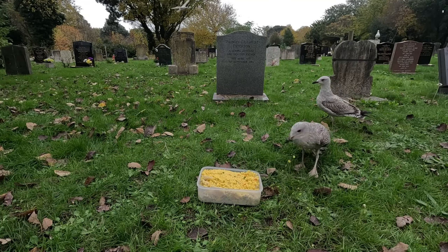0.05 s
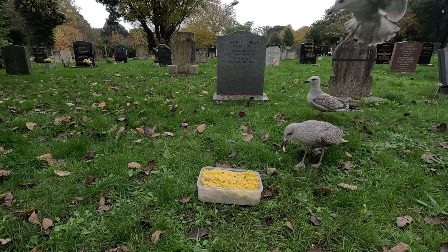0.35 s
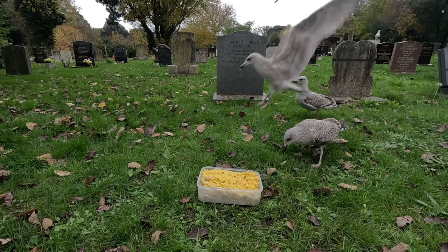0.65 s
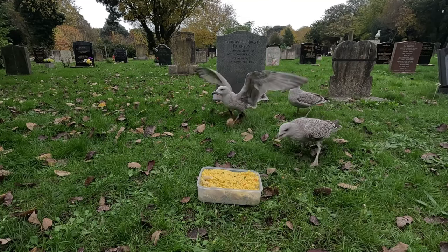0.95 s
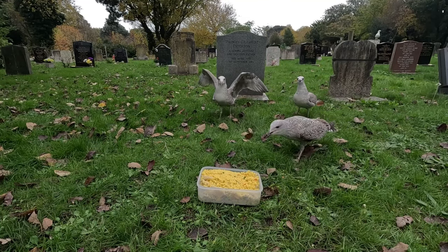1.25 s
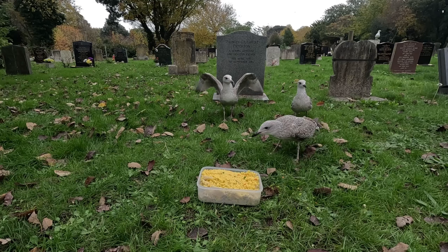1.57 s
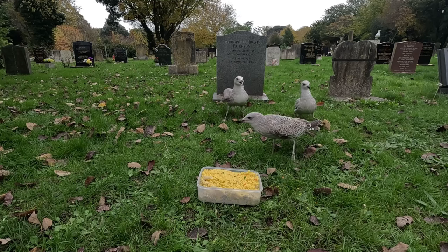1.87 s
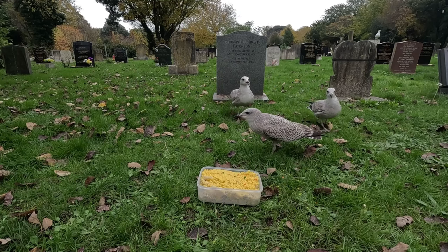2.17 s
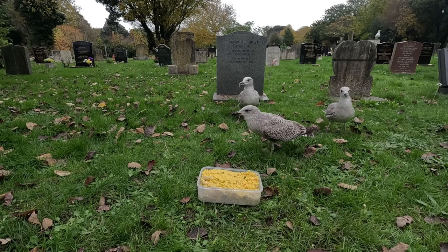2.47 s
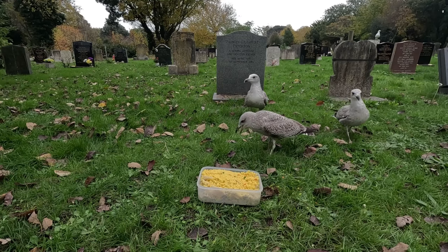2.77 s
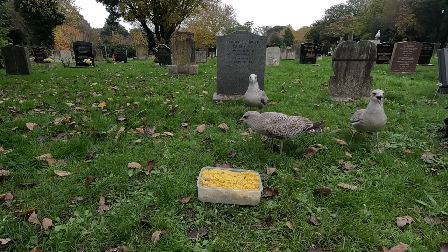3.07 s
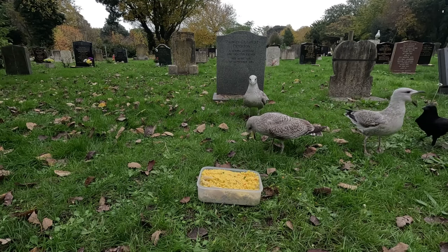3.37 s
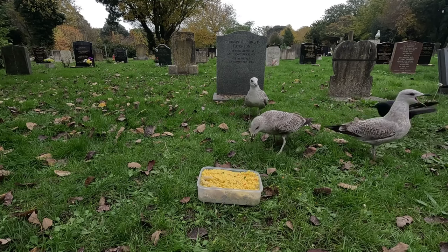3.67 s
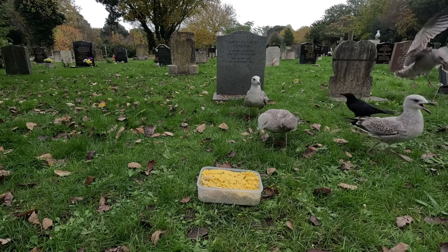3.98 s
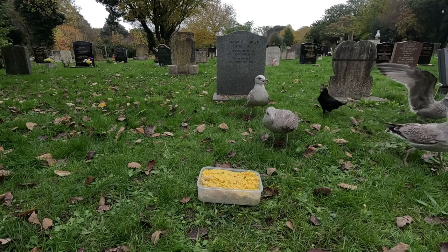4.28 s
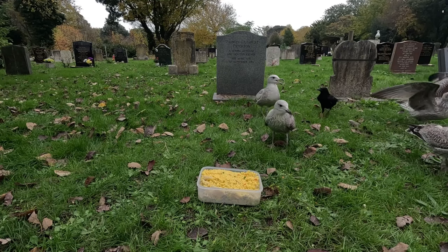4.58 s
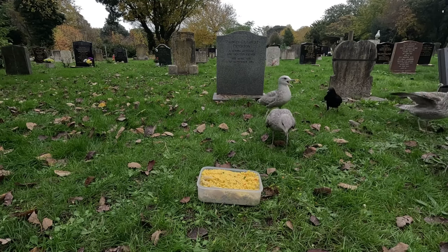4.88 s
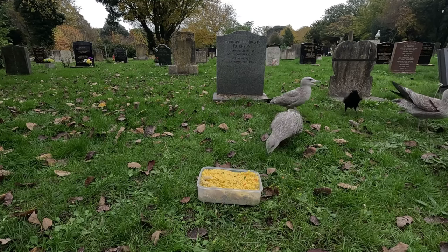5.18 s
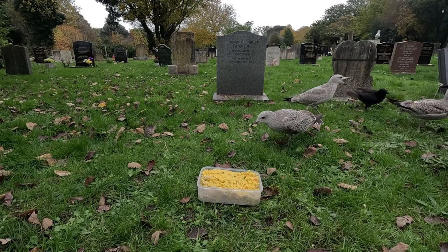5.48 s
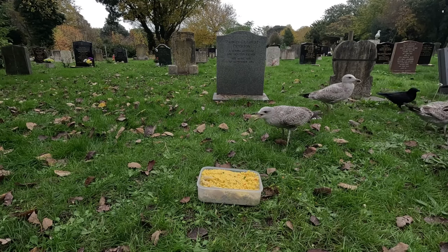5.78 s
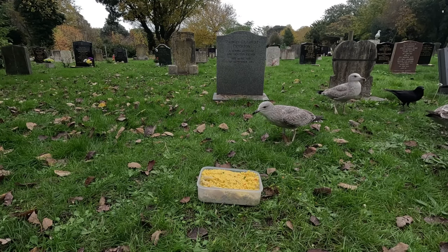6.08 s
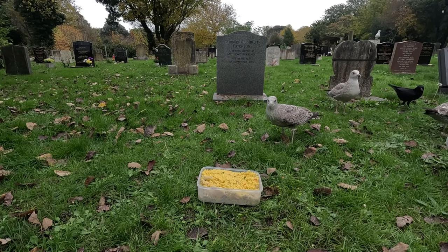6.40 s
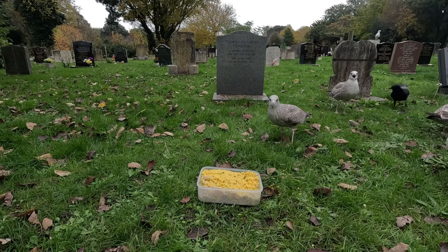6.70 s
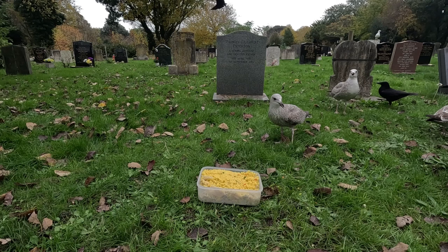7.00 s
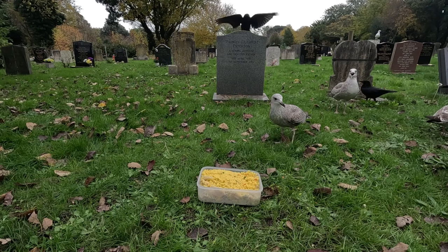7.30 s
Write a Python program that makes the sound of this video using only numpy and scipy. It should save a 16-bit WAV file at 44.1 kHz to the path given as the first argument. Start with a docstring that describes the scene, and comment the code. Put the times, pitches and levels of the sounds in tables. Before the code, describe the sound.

Close up on open grass, young gulls land with soft wing thumps, feather rustle and low gusts on the microphone. They whistle thinly, squeal and squawk in repeated bursts, the whistling thickest in the middle. In the second half a more distant gull yelps again and again, and wings swish once more before a last quavering squeal. A faint outdoor rumble lies beneath.

```python
"""Young gulls squabble over food on an open lawn, close to the microphone. Membranes in the syrinx make
their thin begging whistles, their two-voiced squeals (both sides sounding at once) and their harsh
squawks (uneven pulses ringing in throat and beak). Wings thump and swish as birds land, feathers rustle,
and air buffets the microphone over a faint distant rumble. Further off the flock peeps, a small bird
twitters and one gull gives a run of falling yelps; stones and trees return a dull tail."""
import sys
import numpy as np
from scipy import signal
from scipy.fft import rfft, irfft
from scipy.io import wavfile
from scipy.ndimage import uniform_filter1d

SR = 44100
rng = np.random.default_rng(int(sys.argv[2]) if len(sys.argv) > 2 else 0)


def output_pcm(signal):
    """Save a mono or channel-first signal as 16-bit PCM at the path in sys.argv[1].

    Samples are clipped to [-1, 1] before scaling.
    """
    pcm = np.clip(np.atleast_2d(signal).T, -1, 1) * 32767
    wavfile.write(sys.argv[1], SR, np.round(pcm).astype(np.int16))


N = 328545
TIME = np.arange(N) / SR
CUTOFF_HZ = 15700


def from_db(db):
    return 10 ** (np.asarray(db) / 20)


def rms_one(x):
    return x / np.sqrt(np.mean(x ** 2) + 1e-20)


def gain_at(colour, hz):
    """A colour's gain at these frequencies."""
    known_hz, level_db = np.transpose(colour)
    return from_db(np.interp(np.log(np.maximum(hz, 1)), np.log(known_hz), level_db))


def coloured(x, colour, size=4096):
    """Causal (minimum-phase) filter with the given colour."""
    cepstrum = irfft(np.log(gain_at(colour, np.arange(size // 2 + 1) * SR / size)))
    cepstrum[1:size // 2] *= 2
    cepstrum[size // 2 + 1:] = 0
    return signal.fftconvolve(x, irfft(np.exp(rfft(cepstrum))))[:len(x)]


def noise(colour):
    """Steady noise of a colour, rms 1."""
    return rms_one(coloured(rng.standard_normal(N + SR), colour)[SR:])


def wander(per_s, count):
    """A random value redrawn so many times a second and joined up; spread about 1."""
    return np.interp(np.arange(count) * per_s / SR, np.arange(count), rng.standard_normal(count))


def swells(rows):
    """Gain over time of smooth swells that rise and fall."""
    return sum(from_db(db) * np.exp(-((TIME - s) / half_s) ** 2) for s, half_s, db in rows)


def call(rows, fade_s):
    """The samples that a call covers, its soft-edged gate, and its columns sample by sample."""
    times, *columns = np.transpose(rows)
    start, end = times[0], times[-1]
    span = slice(max(int((start - fade_s / 2) * SR), 0), min(int((end + fade_s / 2) * SR), N))
    t = TIME[span]
    gate = np.sin(np.pi / 2 * np.clip(np.minimum(t - start, end - t) / fade_s + .5, 0, 1)) ** 2
    return span, gate, [np.interp(t, times, column) for column in columns]


def note(start, length_s, fade_s):
    """A note's samples, gate, progress from 0 to 1, and nearness to either end (0 in the middle)."""
    span, gate, (progress,) = call([(start, 0), (start + length_s, 1)], fade_s)
    return span, gate, progress, (2 * progress - 1) ** 2


def phase_of(hz, jitter, per_s):
    """Phase of a membrane whose pitch trembles by the share jitter."""
    return 2 * np.pi * np.cumsum(hz * (1 + jitter * wander(per_s, len(hz)))) / SR


def overtones(phase, hz, colour, highest, flicker_db=3.5):
    """Harmonics from the second up, each flickering and weighted by the colour at its frequency."""
    return sum(gain_at(colour, k * hz) * from_db(flicker_db * wander(79, len(hz)))
               * (k * hz < CUTOFF_HZ) * np.sin(k * phase) for k in range(2, highest + 1))


def two_voices(low_hz, low_db, high_hz, high_db, hoarse, rasp_hz=280, flutter_db=2.5):
    """Two membranes shake each other, adding sum and difference tones; hoarseness makes them rasp."""
    count, jitter = len(low_hz), .02 * hoarse
    tension = 1 + .008 * wander(70, count)
    low = phase_of(low_hz * tension, jitter, per_s=700)
    high = phase_of(high_hz * tension, jitter, per_s=900)
    rasp_depth = hoarse * np.clip(.6 + .4 * wander(40, count), 0, 1)
    rasp = rasp_depth * np.sin(phase_of(np.full(count, rasp_hz), jitter=.3, per_s=120))
    low_gain, high_gain = (from_db(db + flutter_db * wander(130, count)) for db in (low_db, high_db))
    voices = low_gain * np.sin(low) + high_gain * (1 + rasp) * np.sin(high + rasp)
    side_tones = from_db(-14) * np.sin(2 * high - low) + from_db(-16) * np.sin(2 * low - high)
    sum_gain = from_db(-33 + 3 * wander(90, count))
    octave = (.8 + .7 * wander(1500, count)) * (np.sin(low + high) + .7 * np.sin(2 * high))
    sum_tones = sum_gain * (octave + .5 * wander(1500, count) * np.sin(2 * low + high))
    breath = from_db(-12) * wander(1900, count) + from_db(-24) * wander(6300, count)
    hiss = hoarse * breath * np.sin((low + high) / 2)   # centred between the voices
    return np.sqrt(2) * (voices + from_db((low_db + high_db) / 2) * (side_tones + sum_tones + hiss))


# Squeals near the microphone, one list a call. Each row: time in seconds, low voice in Hz, its level
# in dB, high voice in Hz, its level in dB, hoarseness from 0 to 1.
SQUEALS = [
    [(0.0, 3960, -34, 4700, -29.5, 0.9), (.025, 4030, -33, 4700, -36, 0.6),
     (0.047, 3750, -38, 4750, -33, .8), (.073, 4150, -28, 4650, -31, 0.86),
     (0.096, 3920, -19, 4430, -42, .3), (0.125, 3250, -45, 3900, -28, .6)],
    [(1.885, 3280, -25.5, 4080, -26, 0.75), (1.925, 3540, -34, 4010, -17.5, 0.65),
     (1.966, 3760, -27, 4640, -28, 0.54), (2.027, 4490, -33, 5490, -29.5, 0.4),
     (2.1, 4250, -31, 5040, -31, 0.4), (2.185, 4150, -33.5, 5050, -29.5, 0.5)],
    [(2.99, 3730, -43, 4710, -26.5, 0.4), (3.05, 3620, -40.5, 5220, -47.5, .3),
     (3.085, 3740, -33, 5820, -49.5, 0.4)],
    [(4.225, 3300, -34.5, 4050, -28.5, .8), (4.274, 3466, -35.5, 4120, -23, .8),
     (4.318, 3960, -32, 4900, -35, .6), (4.36, 4270, -39.5, 5050, -28, 0.3),
     (4.42, 4050, -30, 4760, -42, 0.3), (4.465, 3780, -34, 4570, -36, 0.7),
     (4.485, 3980, -29.5, 4650, -37, .7), (4.52, 3640, -35, 4290, -31.5, 1),
     (4.59, 3800, -31, 4480, -31, 1)],
    [(6.793, 3150, -31, 3800, -33, .8), (6.81, 3480, -28, 4180, -26, .5), (6.858, 3500, -27, 4300, -25, .4),
     (6.89, 4100, -31, 4950, -27, .4), (6.915, 4470, -39, 5360, -24, 0.3),
     (6.97, 4290, -32, 5060, -28, 0.54), (7.05, 4170, -31, 4880, -30.5, 0.54),
     (7.138, 3900, -32.5, 4840, -31, 0.9)],
]
# The notes a squeal breaks into. Each row: start and length in seconds, low voice in Hz, its level
# in dB, high voice in Hz, its level in dB.
QUAVERS = [(4.59, .04, 3300, -35, 4100, -34), (4.63, .036, 3550, -34, 4300, -36),
           (4.666, .036, 3500, -36, 3950, -29), (4.702, .046, 3350, -30, 3750, -29),
           (4.748, .042, 2680, -26, 3250, -22), (4.79, .046, 2850, -25, 3080, -28),
           (7.138, .042, 4060, -32, 4950, -34), (7.18, .036, 3950, -34, 4780, -35),
           (7.216, .034, 3870, -34, 4550, -34), (7.25, .036, 3800, -35, 4300, -33),
           (7.286, .036, 3720, -33, 4500, -33), (7.322, .042, 3400, -27, 4080, -31),
           (7.364, .042, 3400, -28, 3950, -33), (7.406, .043, 3320, -19, 3950, -41)]


def squeals(quaver_arch=.11):
    """Both sides of the syrinx sound at once, rising and sagging; the longest calls end in a quaver."""
    out = np.zeros(N)
    for rows in SQUEALS:
        span, gate, controls = call(rows, fade_s=0.019)
        out[span] += gate * two_voices(*controls)
    for start, length_s, low_hz, low_db, high_hz, high_db in QUAVERS:
        span, gate, _, edge = note(start, length_s, fade_s=0.006)
        arch = 1 - quaver_arch * edge
        out[span] += gate * two_voices(low_hz * arch, low_db, high_hz * np.sqrt(arch), high_db, hoarse=.5)
    return out


# Breath and feather hiss at close range. Each row: frequency in Hz, gain in dB.
HISS_COLOUR = [(500, -13), (2500, -3), (5000, -11), (7000, -1), (9000, -17), (12500, -20), (15500, -34)]


def throat_hiss(voices, hiss_db=-39.0, flicker_db=4.5):
    """Air rushing through an open beak hisses and flickers, following the level of the call."""
    effort = np.sqrt(np.maximum(uniform_filter1d(voices ** 2, size=400), 0))
    return from_db(hiss_db + flicker_db * wander(120, N)) * effort * noise(HISS_COLOUR)


def rumble(colour, top_hz=600):
    """Noise of moving air, with no treble and an even level."""
    flow = signal.sosfilt(signal.butter(2, top_hz, fs=SR, output="sos"), noise(colour))
    return flow / np.sqrt(uniform_filter1d(uniform_filter1d(flow ** 2, size=1100), size=1100))


# Gusts and wing wash on the microphone, and the far background. Each row: frequency in Hz, gain in dB.
GUST_COLOUR = [(12, -16), (25, 2), (45, 1), (80, -8), (150, -24), (400, -34), (1000, -40)]
BUFFET_COLOUR = [(20, -20), (45, -4), (60, 2), (100, -9), (140, -18), (220, -28), (400, -35), (1000, -50)]
FAR_COLOUR = [(25, 3), (60, -8), (120, -15), (300, -17), (650, -25), (1100, -15), (1800, -24), (4500, -26),
              (6500, -30), (8500, -43), (14000, -52)]
# Puffs of air as birds pass the microphone. Each row: middle and half-length in seconds, deep rumble
# in dB, buffeting in dB.
GUSTS = [(.15, 0.45, -36.5, -45.5), (0.888, 0.11, -27.5, -32), (1.143, 0.09, -29, -37),
         (1.555, 0.21, -32, -39.5), (1.837, 0.055, -27.5, -27), (2.001, 0.094, -30, -27.5),
         (2.17, 0.13, -36, -42.5), (3.714, 0.061, -34, -33.5), (3.885, 0.02, -40, -25.5),
         (4.37, 0.069, -37.5, -55), (5.601, 0.086, -35.5, -31), (5.96, 0.057, -37, -39.5),
         (6.373, 0.13, -36, -55), (6.73, 0.081, -31, -43), (7.25, 0.52, -45, -60)]


def air(breeze_db=-51, lumpy_db=1.5, far_db=-47.5):
    """Gusts rumble on the microphone and close wing wash buffets it; a distant background lies below."""
    gust_gain = from_db(breeze_db) + swells([(s, half_s, db) for s, half_s, db, _ in GUSTS])
    gust = gust_gain * rumble(GUST_COLOUR)
    buffet = swells([(s, half_s, db) for s, half_s, _, db in GUSTS]) * rumble(BUFFET_COLOUR)
    return from_db(lumpy_db * wander(13, N)) * (gust + buffet) + from_db(far_db) * noise(FAR_COLOUR)


def beak_band(x, centre_hz, size=32):
    """The part of a voice within about 600 Hz of the beak's moving resonance."""
    turn = np.exp(2j * np.pi * np.cumsum(centre_hz) / SR)
    window = np.hanning(2 * size + 1)
    return 2 * np.real(turn * signal.fftconvolve(x / turn, window / window.sum(), "same"))


# The throat of a gull close by. Each row: frequency in Hz, gain in dB.
THROAT_COLOUR = [(300, -40), (520, -24), (780, -30), (1200, -4), (1900, -4), (2700, 0), (4100, -7),
                 (5200, -24), (7000, -36), (8500, -46), (14000, -53)]


def harsh_voice(hz, db, doubling, rough, beak_hz, beak_db, patchy_db=4, flutter_db=1.8):
    """Pulses ring in throat and beak; doubling weakens every other one, roughness makes them chaotic."""
    count, rough = len(hz), np.clip(rough, 0, 1)
    unrest = np.sqrt(rough)
    doubling = np.clip(doubling + .45 * unrest * wander(70, count), 0, 1)   # the voice breaks in fits
    hz = uniform_filter1d(hz * (1 + .022 * unrest * wander(90, count)), size=300)
    phase = phase_of(hz, jitter=.05 * rough, per_s=1100)
    cycle = np.round(phase / (2 * np.pi)).astype(int)
    strength = (1 - doubling * (cycle % 2)) * (1 + .7 * rough * rng.uniform(-1, 1, count)[cycle])
    pulses = np.zeros(count)
    for k in range(1, 11):
        smeared_phase = phase - (k - 2) / 2 + .1 * rough * wander(500, count)
        gain = from_db(patchy_db * unrest * wander(110, count)) / (1 + (k * hz / 9500) ** 8)
        pulses += gain * np.cos(k * smeared_phase)
    turbulence = .42 * rough * rng.standard_normal(count)
    voice = coloured(strength * pulses + turbulence, THROAT_COLOUR)
    voice = voice + (from_db(beak_db) - 1) * beak_band(voice, beak_hz)
    voice = signal.sosfilt(signal.butter(4, 450, "high", fs=SR, output="sos"), voice)
    levelled = voice / np.sqrt(uniform_filter1d(voice ** 2, size=260) + 1e-9)
    return from_db(db + flutter_db * unrest * wander(220, count)) * levelled


# Screams close to the microphone, one list a call. Each row: time in seconds, pitch in Hz, relative level
# in dB, period doubling and roughness (both full at 1), beak resonance in Hz, its lift in dB.
SCREAMS = [
    [(0.065, 1336, -40, .95, .9, 2200, 0), (0.106, 1320, -24, .9, .4, 2200, 2),
     (0.159, 1165, -27.5, .8, .4, 2600, -9), (0.222, 1130, -27, .85, .25, 3650, 13),
     (0.24, 1113, -30, 0.8, 0.48, 3600, -9), (0.341, 1048, -38.5, 0.9, 1, 1700, 10),
     (0.41, 1010, -36.5, 0.75, 0.84, 1650, 25), (0.45, 970, -52, .7, 1, 1500, 10)],
    [(2.188, 1327, -14.5, .1, .05, 2650, 4), (2.215, 1487, -16, .35, .03, 4300, 5),
     (2.24, 1515, -16.5, .5, 0, 3700, 5), (2.268, 1442, -19, .05, .01, 4200, 5),
     (2.288, 1393, -17.5, .7, 0, 4200, 4), (2.31, 1358, -21.5, 0.5, 0.08, 4100, 9.5),
     (2.335, 1319, -17.5, .1, 0, 4000, 3), (2.35, 1467, -22.5, 0, 0.34, 3000, -1),
     (2.368, 1610, -19.5, 0.76, .3, 2900, 3.5), (2.392, 1450, -18.5, 0.2, 0.4, 2900, 3),
     (2.424, 1660, -21, 0.33, .4, 3300, 2.5), (2.44, 1466, -20.5, 0, .4, 2900, -5),
     (2.468, 1250, -24.5, 1, 0.3, 2500, -10), (2.485, 1200, -58, 1, .8, 2400, 6),
     (2.52, 1077, -32.5, 0, 0.3, 1100, 22)],
    [(4.843, 1365, -19, .3, .2, 2730, 3), (4.866, 1385, -16.5, .05, .06, 2750, 5),
     (4.885, 1275, -18, .15, .1, 2550, 5), (4.912, 1285, -19, .75, .15, 2900, 3),
     (4.938, 1236, -21, 0.5, 0.3, 2460, 7), (4.96, 1255, -20, 0.83, 0.42, 2530, 8),
     (4.985, 1202, -20.5, 0.3, 0.42, 2400, 8), (5.012, 1197, -18.5, 0.6, 0.2, 2400, 9.5),
     (5.026, 1146, -26.5, 0.94, .7, 2700, -5), (5.05, 1200, -21, 0.85, 0.7, 2650, 1.5),
     (5.07, 1117, -26, .9, 1.1, 1300, 14), (5.098, 1173, -22.5, 0.9, .65, 1800, 9),
     (5.117, 1119, -27, 1, 0.66, 2200, 1), (5.143, 1146, -23, 1, 1, 2800, -1),
     (5.19, 1098, -29, 1, 0.7, 1600, 9), (5.205, 1000, -51, .95, .7, 1600, 0)],
]
# Barks, just as close. Each row: start and length in seconds, pitch and glide in Hz, relative level
# in dB, period doubling and roughness (both full at 1), the beak's lift of the second harmonic in dB.
BARKS = [(1.205, 0.026, 1263, 101, -26.5, 0.6, 0.97, -0.5), (1.395, 0.028, 1134, 206, -35.5, 0.2, 0.5, 6.5),
         (1.501, 0.022, 1170, 217, -32, 1, 0.65, 14.5), (1.676, 0.05, 1276, -62, -35.5, 1, 1, 3.5),
         (1.846, 0.022, 1207, 200, -26.5, 0.15, 0.88, -15.5),
         (2.969, 0.036, 1515, 159, -32.5, 0.2, 1.2, -6), (3.694, 0.03, 1187, 226, -32.5, 0.4, 0.93, 2),
         (3.827, 0.042, 1172, 658, -31.5, 0.06, 0.63, -8.5), (5.219, 0.024, 1136, 39, -35.5, 1, 0.54, 5),
         (5.492, 0.022, 1380, 130, -29.5, 0.3, 0.35, 2.5),
         (5.694, 0.0286, 1262, 287, -28.5, 0.8, 0.83, -4.5), (5.815, 0.053, 1289, 2.5, -30, 0.7, 0.73, 5.5),
         (5.927, 0.13, 1483, -76.5, -31, 0.9, 1.1, -1), (6.765, 0.02, 1360, 77, -35, 0.24, 1.2, -9),
         (7.075, 0.018, 1597, -54, -36, 0, 0.7, 1)]


def squawks(scream_db=1.5, bark_db=8.0, bark_bend=.12, bark_arch_db=9):
    """The harsh voice, drawn out in screams or pushed out in short barks that arch in pitch and level."""
    out = np.zeros(N)
    for rows in SCREAMS:
        span, gate, controls = call(rows, fade_s=.005)
        out[span] += from_db(scream_db) * gate * harsh_voice(*controls)
    for start, length_s, pitch_hz, glide_hz, db, doubling, rough, beak_db in BARKS:
        span, gate, progress, edge = note(start, length_s, fade_s=0.0055)
        hz = (pitch_hz + glide_hz * progress) * (1 - bark_bend * (edge - edge.mean()))
        effort_db = bark_db + db - bark_arch_db * edge
        out[span] += gate * harsh_voice(hz, effort_db, doubling, rough, 2 * hz, beak_db)
    return out


# The thin voice of a young gull nearby. Each row: frequency in Hz, gain in dB.
WHISTLE_COLOUR = [(1800, -2), (3500, -1.5), (4500, -5), (6500, -6.5), (8500, -34), (12500, -46.5),
                  (15500, -85)]


def thin_voice(phase, hz, overtone_db, highest):
    """A membrane's tone, with overtones coloured relative to the fundamental."""
    upper = overtones(phase, hz, WHISTLE_COLOUR, highest) / gain_at(WHISTLE_COLOUR, hz)
    return np.sqrt(2) * (np.sin(phase) + from_db(overtone_db) * upper)


# Begging on the grass close by. Each row: start and length in seconds, pitch and glide in Hz, share by
# which the ends lie under the middle, then relative level, swell from start to end and overtones in dB.
WHISTLES = [(0.102, .028, 3500, -1700, 0.027, -33.5, 0, -10),
            (0.556, 0.018, 2340, 198, -0.04, -39.5, -7, -5.5),
            (0.58, 0.072, 1747, -56, -0.012, -43, -5, -2.5), (0.755, 0.15, 5600, -22, 0.014, -43.5, 2, 0),
            (0.874, 0.02, 6440, 2227, -.01, -54, -10, -3), (0.908, .089, 3850, -370, -0.034, -30, -2, -2.5),
            (0.997, 0.1, 4910, -400, -0.0078, -41.5, 0, -2),
            (1.141, 0.045, 4220, -58, -0.0091, -35.5, -7, -4),
            (1.187, .035, 3450, -68, 0.0034, -31.5, 3, -3.5), (1.28, 0.024, 3420, 62, -0.014, -32, -8, -7),
            (1.317, 0.071, 3385, -110, -0.0088, -29, -2, -11),
            (1.409, 0.13, 4287, -180, -0.03, -28.5, 11, 1.5),
            (1.441, 0.061, 2192, -150, 0.055, -23.5, 3.5, -18),
            (1.549, 0.079, 3760, -280, -0.021, -31.5, -4, -10),
            (1.592, 0.097, 2038, -150, -0.032, -28.5, -3.5, -15),
            (1.834, 0.013, 3470, 37, 0.067, -33, 6, -1), (1.862, 0.02, 2626, -100, 0.022, -20.5, -2, -8),
            (2.472, 0.027, 3275, -490, 0.024, -32, -14, -9.5),
            (2.478, 0.29, 5290, -150, -0.0073, -52.5, -8, 1),
            (2.702, 0.072, 4690, -380, 0.038, -42, -4.5, 3.5),
            (2.956, 0.03, 3140, -36, -0.035, -30, 3.5, 4),
            (2.988, 0.033, 3870, -58.5, -0.0026, -29.5, 1, -5),
            (3.081, .17, 4846, 29, 0.0026, -25.5, 0.5, -8), (3.134, 0.21, 4427, -230, -0.02, -20.5, 13, -7),
            (3.216, 0.2, 4775, -260, 0.0075, -29.5, -3, -22),
            (3.349, 0.018, 3650, -350, -0.024, -30, -1, -14), (3.425, 0.11, 3903, 15, -0.029, -24.5, 1, -9),
            (3.525, 0.27, 4084, -2, 0.019, -26, -3.5, -11.5),
            (3.584, 0.24, 2160, -200, 0.067, -42.5, 9.5, -13.5),
            (3.805, 0.11, 3444, -190, 0.0092, -22, 1, -16),
            (3.856, .16, 4256, -220, -0.031, -26.5, 1.5, -14),
            (3.858, 0.045, 5810, 353.5, -.015, -34.5, -11.5, 7),
            (3.915, 0.028, 3810, 40, -0.0094, -22, 3, -19), (3.938, .013, 4550, 147, -0.015, -26, 2, -6),
            (3.952, 0.055, 5390, -150, 0.0084, -31, -10, -6),
            (3.97, 0.17, 6830, -140, 0.014, -41.5, 2.5, -4),
            (4.006, 0.062, 3690, -400, -0.018, -27.5, 14.5, -22),
            (4.019, 0.073, 4610, -210, -0.02, -30.5, 11, 0), (4.093, 0.034, 3700, 16, -0.044, -26, -3, 1),
            (4.129, 0.051, 4410, 215, -0.035, -26.5, -9, -3), (4.139, 0.056, 2360, 57, 0.028, -32, 3.5, -9),
            (4.177, 0.056, 2600, -8, -0.041, -22, 4.5, -7.5),
            (4.46, 0.029, 2690, -200, 0.021, -22.5, 0, -21), (4.639, 0.037, 3050, -40, -0.015, -26, 0, -10),
            (4.691, 0.13, 2024, 11, -0.038, -38.5, -8, -6),
            (5.322, 0.095, 3940, -16, -0.0066, -32.5, 0, -15),
            (5.482, 0.017, 2270, -110, 0.045, -23.5, 8, -5),
            (5.494, 0.03, 2930, 150, -0.01, -22, -7, -12.5), (5.53, 0.053, 3880, 1, 0.06, -27, 5, -14),
            (5.586, 0.026, 3440, 16, -0.0062, -20, -7.5, -5),
            (5.583, 0.077, 4670, 149, -0.014, -28.5, 12, -4), (5.612, 0.034, 2540, 42, 0.071, -29, -2, -5),
            (5.657, 0.15, 2540, -180, -0.0086, -29.5, 4, -11.5),
            (5.658, .085, 5410, -140, 0.0048, -28.5, -9.5, -7),
            (5.739, 0.18, 4570, -250, -0.014, -23, -2.5, -14),
            (5.785, 0.03, 2020, -200, -0.039, -26, 2, -18), (5.86, 0.088, 5960, 402, 0.11, -32, -9, 8),
            (5.871, .18, 4350, -210, 0.022, -29, -8.5, 4), (5.954, .13, 6020, -200, 0.0072, -34.5, -5, 11),
            (5.999, 0.081, 3630, -210, 0, -30, 2, -4.5), (6.093, 0.069, 2536, -150, -0.027, -28, -5, -6.5),
            (6.21, 0.087, 4270, -140, -0.0056, -43, 1, 7),
            (6.772, 0.019, 2915, -41, -0.018, -20.5, 3, -5.5),
            (7.069, 0.014, 6480, -3, 0.0038, -26.5, 4, -3),
            (7.069, 0.036, 3230, -84, -0.0082, -30, -10, -7),
            (7.345, 0.027, 6660, 130, -0.014, -32.5, -6, 1)]


def whistles(scratchy_s=0.066, end_droop=0.014, flutter_db=1.5, level_db=1.5):
    """Thin tones glide, waver and droop as they end; short squeaks scratch, longer whistles settle."""
    out = np.zeros(N)
    for start, length_s, pitch_hz, glide_hz, bend, db, swell_db, overtone_db in WHISTLES:
        span, gate, progress, edge = note(start, length_s, fade_s=min(.018, .3 * length_s))
        count, scratch = len(gate), min(1, scratchy_s / length_s)
        waver = scratch * (.007 * wander(190, count) + .009 * wander(60, count))
        unsteady_db = 3.2 * scratch * wander(50, count)
        ending = np.clip(1 - (start + length_s - TIME[span]) / 0.016, 0, 1)
        hz = (pitch_hz + glide_hz * progress) * (1 - bend * edge - end_droop * ending + waver)
        phase = phase_of(hz, jitter=.011 * scratch, per_s=930)
        tone = thin_voice(phase, hz, overtone_db, highest=5)
        grain = 1 + .12 * scratch * wander(1100, count)
        effort_db = db + swell_db * (progress - .5) + unsteady_db + flutter_db * wander(120, count)
        out[span] += gate * grain * tone * from_db(level_db + effort_db)
    return out


def stroke(start, rise_s, decay_s):
    """Envelope of one push of air."""
    since = TIME - start
    return np.clip(since / rise_s + .5, 0, 1) * np.exp(-np.maximum(since - rise_s, 0) / decay_s)


# A wing's thump and swish at close range. Each row: frequency in Hz, gain in dB.
THUMP_COLOUR = [(15, -22), (30, -3), (60, 2), (90, -1), (130, -7), (200, -18), (260, -28), (600, -45),
                (2000, -78)]
SWISH_COLOUR = [(120, -6.5), (350, 5), (700, -1), (2000, -4.5), (6000, -22.5), (9000, -35.5),
                (15000, -71.5)]
# Birds landing by the microphone. Each row: start in seconds, relative levels of thump and swish in dB,
# decay of the swish in seconds.
WINGBEATS = [(0.119, -19.5, -49, 0.073), (0.169, -16, -48, 0.051), (0.277, -20, -47.5, 0.1),
             (0.408, -46, -51.5, 0.092), (0.607, -21, -51.5, 0.043), (0.82, -11.5, -61, .03),
             (.89, -14, -71, 0.027), (1.134, -24.5, -55.5, 0.079), (1.229, -40, -48, 0.082),
             (1.7, -14.5, -51.5, 0.049), (1.81, -25, -54, 0.034), (1.988, -12.5, -54.5, 0.18),
             (2.329, -23, -52, 0.035), (3.694, -33, -72, 0.017), (5.519, -17, -70, .02),
             (5.588, -19.5, -74, .02), (5.941, -39, -54.5, 0.19), (6.537, -47, -45, .03),
             (6.579, -31, -43, 0.043), (6.601, -27, -43, 0.029), (6.646, -14, -38.5, 0.015),
             (6.702, -24, -46, 0.19), (6.761, -41, -43.5, 0.018), (6.92, -51, -50.5, 0.24),
             (7.2, -49, -56, 0.19)]


def wings(thump_db=-9.0, swish_db=10.5):
    """Each beat pushes a dull thump of air, and the feathers swish or clap."""
    thump = sum(from_db(db) * stroke(s, rise_s=0.011, decay_s=0.015) for s, db, _, _ in WINGBEATS)
    swish = sum(from_db(db) * stroke(s, rise_s=0.0044, decay_s=decay) for s, _, db, decay in WINGBEATS)
    thumps = from_db(thump_db) * thump * rumble(THUMP_COLOUR)
    return thumps + from_db(swish_db) * swish * noise(SWISH_COLOUR)


# Wheezes close by. Each row: start and length in seconds, pitch and glide in Hz, level in dB.
WHEEZES = [(.64, .12, 5300, 400, -47), (1.03, .07, 4500, -1400, -43), (1.29, .09, 3500, -200, -35),
           (1.36, .12, 5500, -500, -35), (2.1, .085, 2400, -150, -41), (3.87, .07, 3250, -100, -30),
           (4.23, .3, 2380, -80, -36), (4.29, .17, 2830, -130, -31), (6.14, .04, 4300, -700, -36)]


def wheezes():
    """Whistles that never settle: the membrane rattles, smearing the tone into a hoarse band."""
    out = np.zeros(N)
    for start, length_s, pitch_hz, glide_hz, db in WHEEZES:
        span, gate, progress, edge = note(start, length_s, fade_s=0.024)
        hz = pitch_hz + glide_hz * progress
        phase = phase_of(hz, jitter=.045, per_s=1300)
        rattle = from_db(3.5 * wander(450, len(hz)) - 4 * edge)
        out[span] += gate * rattle * from_db(db) * thin_voice(phase, hz, overtone_db=-6.0, highest=3)
    return out


# Wings braking, folding or brushing the grass nearby. Each row: middle and half-length in seconds,
# relative level in dB.
RUSTLES = [(.875, 0.02, -44), (1.03, 0.085, -48), (1.4, 0.12, -51.5), (3.95, 0.42, -55)]


def rustle(crackle_db=5.0, fits_db=3.0, level_db=1.0):
    """Stiff feathers slide over each other in fits, with a fine crackle."""
    friction = from_db(level_db + crackle_db * wander(700, N) + fits_db * wander(45, N))
    return swells(RUSTLES) * friction * noise(HISS_COLOUR)


# The flock further across the lawn. Each row: middle and half-length in seconds, relative level in dB.
PEEPING_BOUTS = [(1.35, 0.44, -43.5), (2.6, 0.24, -52.5), (3.1, 0.14, -37.5), (4.08, 0.26, -28.5),
                 (5.6, 0.4, -33), (6.55, 0.075, -42), (7.4, 0.29, -32.5)]


def flock(count=260, lowest_hz=2900, highest_hz=6600, typical_s=.09, level_db=-2.0):
    """Faint overlapping peeps from other young birds, most sagging a little in pitch."""
    out = np.zeros(N)
    for k, (delay, height, length, sag) in enumerate(rng.random((count, 4))):
        start = (k + delay) / count * (N / SR - typical_s)
        end = start + typical_s * (.5 + length)
        pitch_hz = lowest_hz + height * (highest_hz - lowest_hz)
        span, gate, (hz,) = call([(start, pitch_hz), (end, pitch_hz * (1.04 - 0.14 * sag))], fade_s=0.01)
        out[span] += gate * np.sin(phase_of(hz, jitter=.022, per_s=1200)) / (1 + height)
    return rms_one(out) * from_db(level_db) * swells(PEEPING_BOUTS)


# A small bird far off. Each row: start and length in seconds, top pitch in Hz, level in dB.
TWITTERS = [(1.04, 0.021, 10500, -58), (1.068, 0.024, 10700, -64), (1.102, .042, 10900, -59),
            (1.245, 0.032, 9200, -57.5), (1.545, 0.037, 9100, -56)]


def twitters(arch=0.15):
    """Very high, nearly pure notes that arch in pitch."""
    out = np.zeros(N)
    for start, length_s, top_hz, db in TWITTERS:
        span, gate, _, edge = note(start, length_s, fade_s=.008)
        phase = phase_of(top_hz * (1 - arch * edge), jitter=.008, per_s=900)
        out[span] += gate * from_db(db) * np.sin(phase)
    return out


# The throat of the further gull, heard across the lawn. Each row: frequency in Hz, gain in dB.
YELP_COLOUR = [(900, 4), (1150, 8), (1420, 2), (2100, -6), (2750, 0), (3600, -10), (4300, -18), (5500, -29),
               (7000, -32), (9000, -48)]


def yelp_voice(hz, overtone_db=3.0, flutter_db=1.5):
    """A slightly hoarse harmonic voice, loudest where it meets the throat's lowest resonance."""
    phase = phase_of(hz, jitter=.015, per_s=1100)
    upper = from_db(overtone_db) * overtones(phase, hz, YELP_COLOUR, highest=5)
    tone = gain_at(YELP_COLOUR, hz) * np.sin(phase) + upper
    return np.sqrt(2) * tone * from_db(flutter_db * wander(250, len(hz)))


# One gull well back from the microphone. Each row: start and length in seconds, held pitch in Hz, final
# drop as a share of it, then relative level, swell and the opening note's relative level in dB.
YELPS = [(1.252, 0.12, 1183, 0.08, -49.5, 17, -44.5), (2.57, 0.16, 1244, 0.1, -57.5, 9, -47),
         (3.05, 0.16, 1276, 0.11, -48.5, -2, -40.5), (3.385, 0.26, 1415, 0.06, -50, -19, -45),
         (3.982, 0.24, 1405, 0.23, -47, 11, -37.5), (4.334, 0.18, 1450, 0.32, -45, 5.5, -38.5),
         (4.62, 0.18, 1385, 0.29, -44, 8.5, -37.5), (5.183, 0.16, 1420, 0.23, -41.5, 2, -36),
         (5.458, 0.16, 1431, 0.3, -43, 2, -39), (5.736, 0.17, 1459, 0.37, -47.5, 10.5, -41.5),
         (6.022, 0.17, 1390, 0.36, -43.5, 5, -44), (6.314, 0.14, 1358, 0.15, -38.5, 5, -37),
         (6.462, 0.16, 1436, 0.083, -42, -4, -38), (6.649, 0.11, 1288, 0.15, -39.5, -5, -31),
         (6.964, 0.11, 1203, 0.15, -43, -9.5, -33), (7.288, 0.13, 1061, 0.07, -41.5, 11.5, -37)]


def yelps(opening_s=.03, opening_hz=1086, opening_db=-2.5, held_db=6.0, drop_s=.085, push_db=3.0):
    """A short low note flips up to a held one, pushed harder as it sinks and the breath runs out."""
    out = np.zeros(N)
    for start, length_s, pitch_hz, drop, db, swell_db, first_db in YELPS:
        span, gate, _, _ = note(start, opening_s, fade_s=0.008)
        wavering_hz = opening_hz * (1 + .12 * wander(900, len(gate)))
        out[span] += gate * from_db(opening_db + first_db) * yelp_voice(wavering_hz, overtone_db=-1.0)
        span, gate, progress, _ = note(start + opening_s, length_s - opening_s, fade_s=0.014)
        sinking = np.clip(1 - (start + length_s - TIME[span]) / drop_s, 0, 1) ** 2
        effort_db = db + swell_db * (progress - .5) + push_db * np.sin(np.pi * sinking)
        out[span] += gate * from_db(held_db + effort_db) * yelp_voice(pitch_hz * (1 - drop * sinking))
    return out


def lawn_echo(x, first_echo_s=0.026, t60_s=.8, dull_hz=4500, level_db=-21.5):
    """Stones and trees scatter back a weak, dull tail."""
    t = TIME[:SR]
    tail = rng.standard_normal(SR) * from_db(-60 * t / t60_s) * (t > first_echo_s)
    tail = signal.sosfilt(signal.butter(2, dull_hz, fs=SR, output="sos"), tail / np.linalg.norm(tail))
    return from_db(level_db) * signal.fftconvolve(x, tail)[:N]


def scene(far_echo_db=9.5):
    """The lawn from beside the squabble: the further birds arrive with more of the surroundings."""
    hoarse = squeals() + squawks()
    near = whistles() + wheezes() + hoarse + throat_hiss(hoarse)
    far = yelps() + flock() + twitters()
    echo = lawn_echo(near + from_db(far_echo_db) * far)
    return near + far + echo + wings() + rustle() + air()


def record(dry):
    """One microphone, with the highest treble cut steeply."""
    return signal.sosfilt(signal.cheby2(12, 70, CUTOFF_HZ, fs=SR, output="sos"), dry)[None]


dry = scene()
out = record(dry)
output_pcm(out)
```